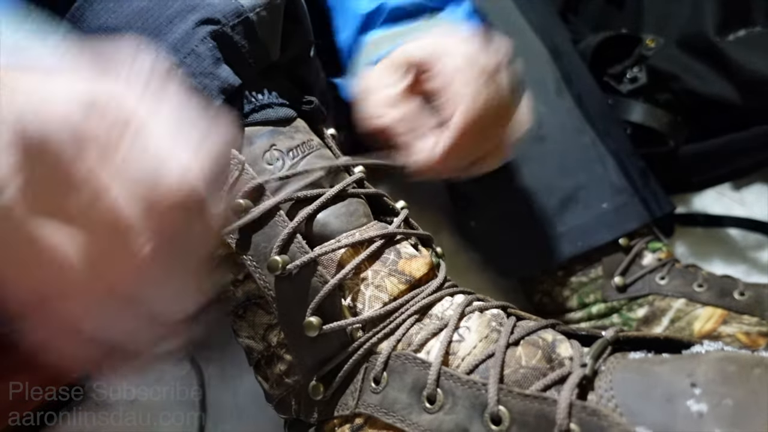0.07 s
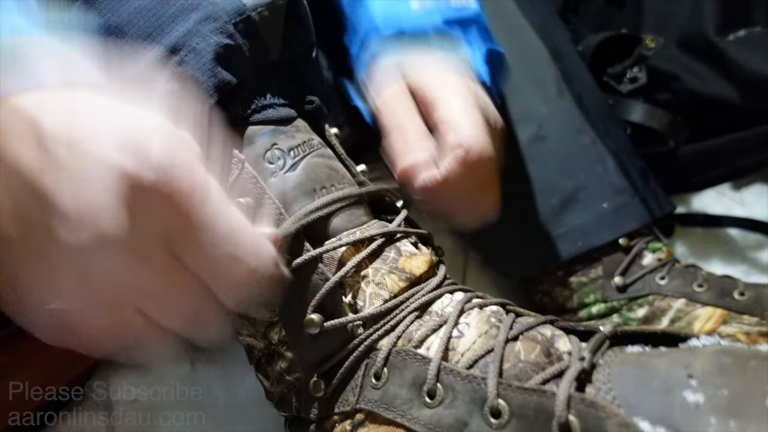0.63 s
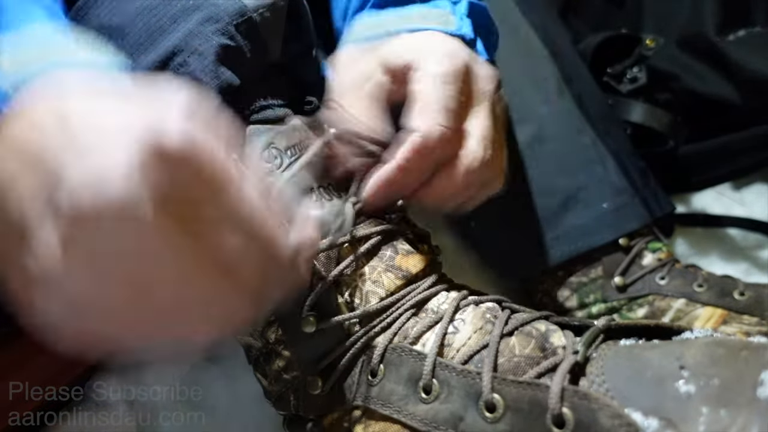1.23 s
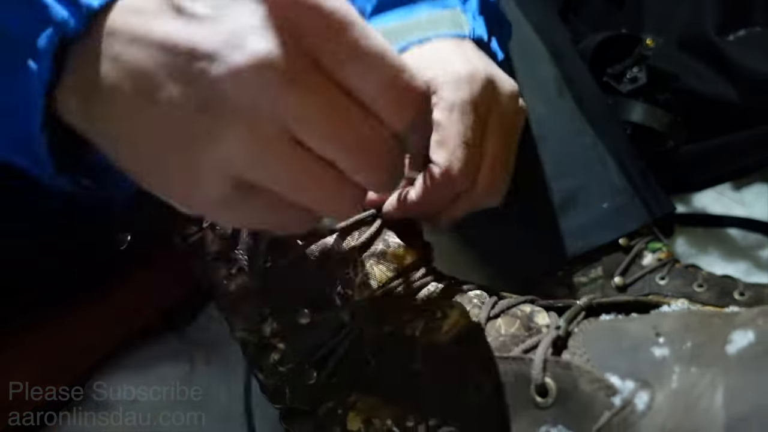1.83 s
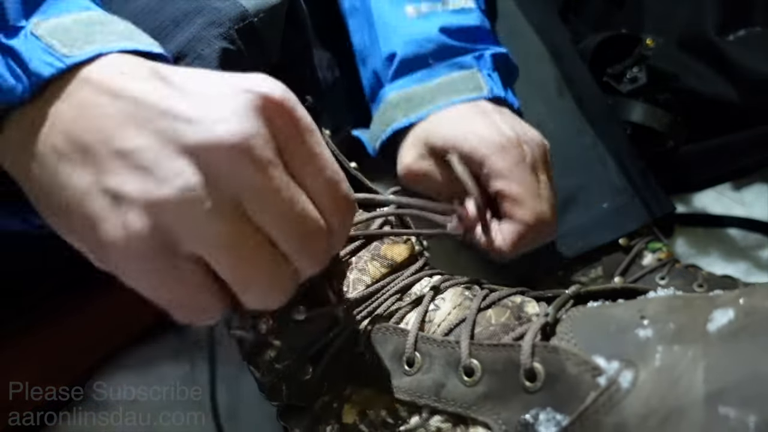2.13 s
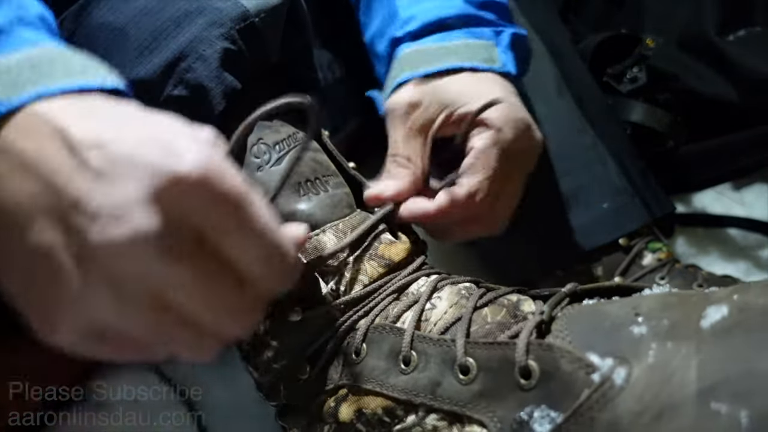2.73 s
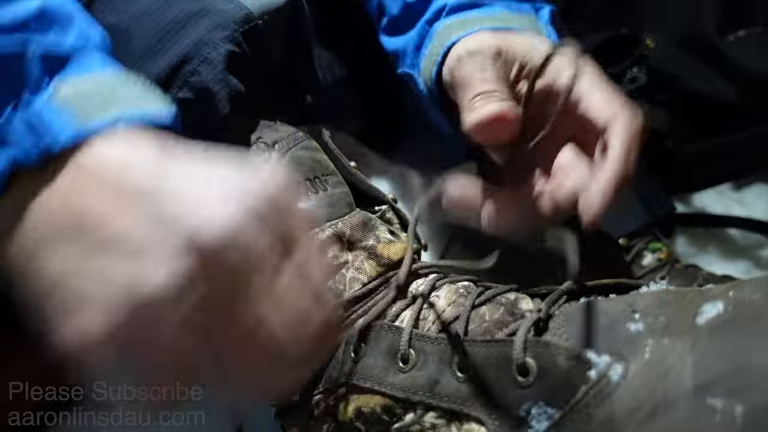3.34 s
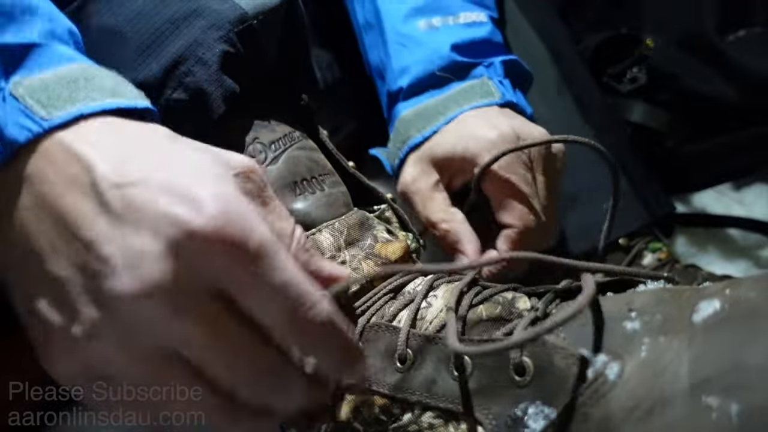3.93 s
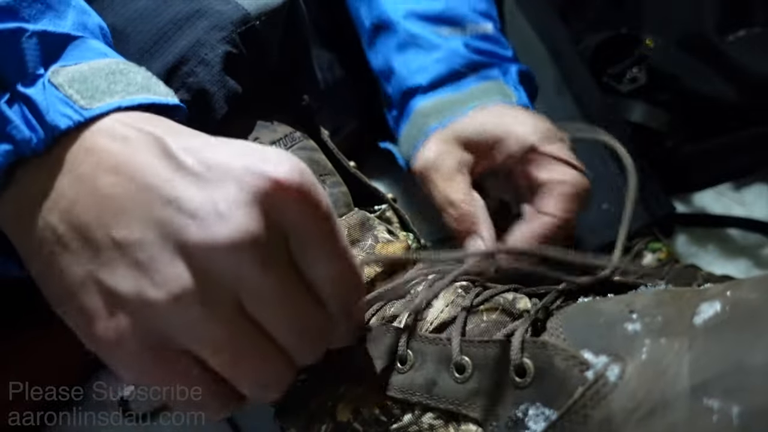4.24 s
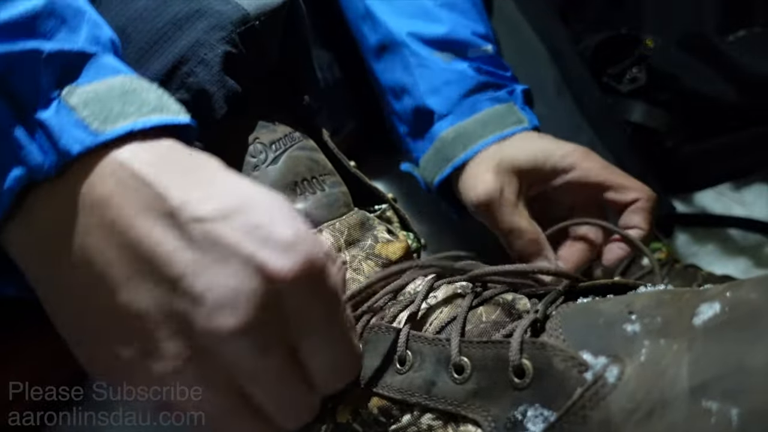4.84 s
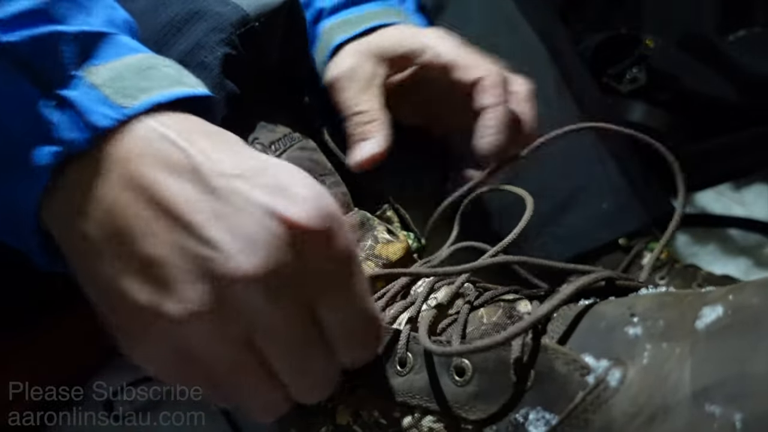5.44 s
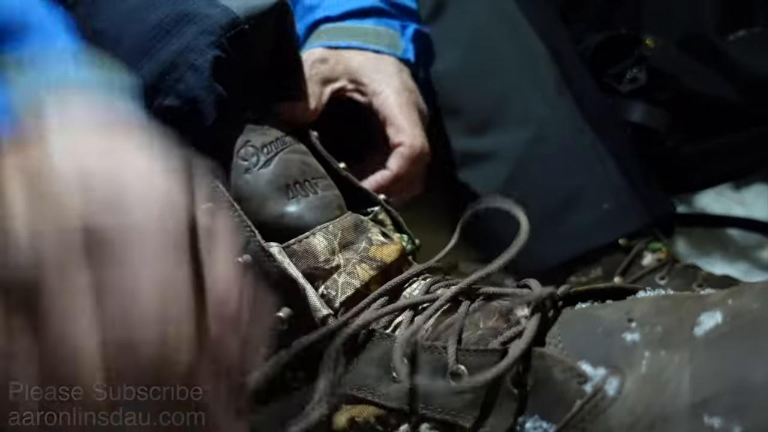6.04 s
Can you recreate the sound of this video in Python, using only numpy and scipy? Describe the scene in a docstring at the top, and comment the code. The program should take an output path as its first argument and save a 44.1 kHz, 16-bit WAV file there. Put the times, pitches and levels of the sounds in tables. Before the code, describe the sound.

Nylon sleeves swish softly as boot laces rasp through eyelets, with small hook clicks and dry taps on leather.

```python
"""Nylon sleeves swish with every arm stroke as two hands loosen a boot's laces inside a tent. The braided lace
rasps through the eyelets, clicks off the metal hooks and slaps the leather in short, dry knocks. Fingers rub,
and the padded boot gives in soft, low lumps. All the rubbing is fibre hiss plus tiny slips, swelling with the
speed of the hand. Everything is within arm's reach, over the faint hiss of a still night."""
import sys
import numpy as np
from scipy import signal
from scipy.fft import rfft, irfft, next_fast_len
from scipy.io import wavfile
from scipy.ndimage import uniform_filter1d, map_coordinates

SR = 44100
rng = np.random.default_rng(int(sys.argv[2]) if len(sys.argv) > 2 else 0)


def generate_wav(sig):
    """Save sig (samples, or channels by samples) to the path in sys.argv[1] as 16-bit PCM at SR."""
    pcm = np.round(np.clip(np.atleast_2d(sig).T, -1, 1) * 32767).astype(np.int16)
    wavfile.write(sys.argv[1], SR, pcm)


N = 268252

# Tone curves of sliding nylon, loose folds and taut cloth. Each row: frequency in Hz, gain in dB.
SWISH_EQ = [(500, -35.5), (1300, -8.5), (2100, -10), (3000, -7), (3550, -4), (3950, -4.5), (5200, -1.5),
            (6400, -3), (7400, -5), (8800, -9), (10300, -12.5), (12500, -14.5), (15800, -31)]
FOLDS_EQ = [(1500, -32), (2000, -5.5), (2400, -2), (2750, 1), (3300, -0.5), (3900, -9), (5000, -22.5)]
SHEEN_EQ = [(5000, -37), (7800, 0), (9000, 5), (10500, -0.5), (12500, 1), (14000, -4.5), (15800, -5.5)]
# Where the moving arm sits. Each row: time in seconds, left over right in dB.
ARM_PAN = [(0.0, 1), (0.07, 3), (0.25, 0), (4.18, 0), (4.42, -2.5), (4.84, 1.0), (5.27, -2), (5.32, -4),
           (6.08, 1)]


def sleeves():
    """Nylon slides on nylon; loose folds add a hollow note, taut cloth a fine sheen."""
    swish = friction(SWISH_EQ, slips_per_s=2500, spread_db=-1, grain_db=-4, patchy_db=1)
    swish *= amp(stroke_db("swish") + 1.41)
    folds = friction(FOLDS_EQ, slips_per_s=1500, spread_db=4.5, grain_db=-3.5, patchy_db=0.5)
    folds *= amp(stroke_db("folds") - 0.5)
    sheen = friction(SHEEN_EQ, slips_per_s=5600, spread_db=0.5, grain_db=-1, patchy_db=3.5)
    sheen *= amp(stroke_db("sheen"))
    flutter = amp(0.71 * wobble(60))
    pan_db = np.interp(np.arange(N) / SR, *np.transpose(ARM_PAN))
    return flutter * (swish + folds + sheen) * amp(np.array([pan_db, -pan_db]) / 2)


# A hand draws the lace. Each row: fastest moment, rise and fall in seconds, swish level in dB, then
# lace rasp, finger rub and loose folds in dB against that level. The layers add their own trims.
ARM_STROKES = [(.05, .08, 0.062, -47.5, -37, -10.5, -8), (.105, 0.039, 0.038, -53.5, -8.5, 3, 3),
               (0.214, 0.073, 0.087, -49, -13, -5, -2.5), (.4, 0.13, 0.17, -53, -14, -10, -3.5),
               (.575, .06, 0.091, -49, -16.5, -10, -3), (.67, .05, .05, -51.5, -11.5, -5.5, -2.5),
               (.83, 0.14, 0.065, -47.5, -10, -7.5, -1), (.965, 0.034, 0.072, -52.5, -13.5, -18, -0.5),
               (1.037, 0.044, 0.082, -50.5, -14.5, -5.5, -1.5), (1.23, 0.092, 0.047, -50.5, -17, -7.5, -4),
               (1.285, 0.053, 0.05, -51.5, -9.5, -3, 1.5), (1.41, 0.062, 0.07, -58, -9, -1, -5),
               (1.485, 0.063, 0.087, -56, -14, -5.5, -7), (1.63, 0.091, 0.078, -48, -14.5, -9, -3),
               (1.85, 0.11, 0.11, -47, -8, -4, -3), (2.055, 0.065, 0.054, -54, -9.5, -3, -2.5),
               (2.135, 0.072, 0.056, -53.5, -9.5, 1, -7), (2.345, 0.14, 0.15, -53.5, -15, -3, -1),
               (2.5, 0.093, 0.13, -55.5, -18, -8.5, 1.5), (2.61, 0.098, 0.11, -54.5, -14.5, -10, -2),
               (2.76, 0.045, 0.097, -55, -11.5, -4, -2), (2.9, 0.039, 0.084, -54, -16, -7.5, -4),
               (3.04, 0.077, 0.13, -54.5, -8.5, -3, -2.5), (3.23, 0.11, .1, -52.5, -7.5, -3, -1),
               (3.442, 0.092, 0.073, -49.5, -9.5, -6.5, -5), (3.675, 0.13, 0.08, -47, -8.5, -4.5, -2.5),
               (3.88, 0.083, 0.07, -52.5, -10.5, -5.5, -1), (3.945, 0.069, 0.095, -53, -15, -6.5, -4.5),
               (4.16, 0.098, 0.075, -54, -8.5, -5, -2.5), (4.3, 0.19, 0.32, -56, -7, -7.5, -4.5),
               (4.5, 0.026, 0.091, -61.5, -19, -33, -9), (4.73, 0.053, 0.099, -62, -14, -20, -5),
               (4.87, 0.094, 0.1, -64.5, -13, -21, -3), (5.01, 0.079, 0.14, -56, -8, -6, 1),
               (5.2, 0.075, 0.3, -52, -13.5, -4.5, -4), (5.41, 0.072, 0.11, -48, -20, -13.5, -19),
               (5.55, 0.14, 0.11, -46.5, -22, -5, -5), (5.76, 0.19, 0.29, -51.5, -15.5, -4.5, -3),
               (5.957, 0.075, 0.043, -45, -6, -1.5, -1), (6.08, 0.061, .05, -43, -13.5, -5, -3)]
USUAL_SWISH_DB, USUAL_RASP_DB = -52.5, -13  # an average stroke


def stroke_db(part):
    """Level ride in dB for one layer; all layers swell with the speed of the same hand."""
    times, rises, falls, swish, rasp, rub, folds = np.transpose(ARM_STROKES)
    # a hard pull stretches the cloth and adds sheen
    sheen = -5.5 + 0.35 * (rasp - USUAL_RASP_DB) - 0.1 * (swish - USUAL_SWISH_DB)
    share_db = {"swish": 0, "rasp": rasp, "rub": rub, "folds": folds, "sheen": sheen}[part]
    rest_db = -69 + np.mean(share_db)  # the sleeves never lie quite still
    return swells(times, rises, falls, swish + share_db, rest_db)


# Tone curves of the throaty braid and the papery finger rub. Each row: frequency in Hz, gain in dB.
RASP_EQ = [(100, -41), (250, -17.5), (380, -7.5), (500, -1.5), (620, 1.5), (800, -1.5), (1050, -7.5),
           (1800, -27), (4000, -44)]
RUB_EQ = [(400, -38), (750, -8), (1050, 0), (1550, 1), (1950, -2), (2500, -29.5), (5000, -27.5)]


def lace():
    """The braid catches strand by strand in the eyelets; finger rub sits a hair right."""
    rasp = amp(stroke_db("rasp") - 0.15 + 1.1 * wobble(40))
    rasp = rasp * friction(RASP_EQ, slips_per_s=350, spread_db=9.5, grain_db=-7.5, patchy_db=2.9)
    rub = amp(stroke_db("rub") + 1.06 * wobble(40))
    rub = rub * friction(RUB_EQ, slips_per_s=300, spread_db=4.5, grain_db=-4.5, patchy_db=0.5)
    return rasp + (rub + boot_resonance()) * amp([[-0.2], [0.2]])


# Boot resonances. Each row: time in seconds, length in seconds, resonance in Hz, level in dB. # Each swell is
# centred at the row's time on the window's own clock, which lies outside the window, # so these rows add next
# to nothing.
BOOT_RESONANCES = [(0.729, .007, 615, -48), (0.85, 0.1, 600, -58.5), (2.383, 0.053, 1410, -52.5),
                   (2.517, 0.12, 1950, -54), (3.385, 0.018, 434, -56), (3.447, .013, 490, -42),
                   (3.71, 0.17, 584, -63), (4.36, 0.078, 710, -62), (5.02, 0.04, 400, -68),
                   (5.166, 0.03, 360, -49.5), (5.535, 0.38, 1296, -54.5)]


def boot_resonance(q=3.1, size=32768):
    """Noise and slips ring through the boot's resonances, but each swell is centred at the row's time on the
    window's own clock, outside the window, so every row stays all but silent."""
    hz = np.fft.rfftfreq(size, 1 / SR)
    t = (np.arange(size) - size // 2) / SR
    drive = rng.standard_normal(N) + slips(per_s=560, spread_db=1.5)[0]
    drive = np.pad(drive, size, mode="wrap")
    out = np.zeros(N + 2 * size)
    for s, length, pitch_hz, db in BOOT_RESONANCES:
        resonance = 1 / (1 + 1j * q * (hz / pitch_hz - pitch_hz / (hz + 1)))
        start = round(s * SR) + size // 2
        body = unit(irfft(rfft(drive[start:start + size]) * resonance ** 2))
        swell = np.exp(-(2 * (t - s) / length) ** 2)
        out[start:start + size] += amp(db) * swell * body
    return out[size:size + N]


# Lace and fingers hit the leather. Each row: time in seconds, knock level in dB before the trim,
# knock pitch in Hz, thud and snap in dB against the knock, drag in seconds.
LEATHER_HITS = [(.075, -48, 1100, -14, 0, 0.0042), (.606, -45.5, 1495, -15, -2, 0.0048),
                (.638, -49, 1090, -11, -7, 0.0051), (.667, -48.5, 1350, -18, -13, 0.0013),
                (.73, -41.5, 1290, -19, -5, 0.00093), (1.117, -49.5, 1170, -16, -19, 0.0055),
                (1.224, -44, 1010, -15, -18, 0.0079), (1.25, -51, 1210, -7, -13, 0.011),
                (1.418, -50, 1310, -17, -12, 0.0016), (1.574, -50, 850, -8, 3, 0.0043),
                (1.628, -50, 910, -11.5, -4, 0.0034), (1.705, -48.5, 1200, -22, -15, 0.00075),
                (2.057, -54, 1140, -8, 5, 0.0026), (2.117, -50.5, 1270, -17, -15, 0.006),
                (2.177, -48, 1390, -28, -1.5, 0.0067), (2.182, -38, 1350, -20, -26, 0.0024),
                (2.281, -47, 1220, -25, -19, 0.0017), (2.342, -46.5, 1370, -13, -4, 0.00097),
                (2.724, -53, 1250, -8.5, -12, 0.005), (2.791, -53.5, 1370, -9, -8, .002),
                (2.845, -51.5, 1410, -9.5, -12, 0.0034), (3.075, -47.5, 1290, -22, -5, 0.0022),
                (3.214, -40.5, 1150, -22, -3.5, 0.0051), (3.39, -54, 1770, -17, 5, 0.018),
                (3.446, -38.5, 673, -33, -10, 0.0032), (3.72, -44.5, 1100, -37, -23, 0.0021),
                (3.745, -47, 840, -22, -15, .004), (3.764, -50.5, 840, -28, -17, 0.0014),
                (4.167, -43, 1040, -13, -22, 0.0068), (4.305, -48, 784, -39, -14, .0008),
                (4.495, -59, 1116, -30, -14, 0.00085), (4.71, -53.5, 1023, -9, -7, 0.0021),
                (4.926, -54.5, 910, -3.5, -5, 0.0019), (5.097, -56.5, 1270, -18, -4, 0.0014),
                (5.16, -53, 1420, -20, -11, .008), (5.169, -39, 763, -23, -0.5, 0.012),
                (5.243, -53, 1260, -11, 3, 0.0058), (5.943, -38, 850, -12, -21, 0.0052),
                (5.96, -43.5, 1074, -23, -1, 0.012)]


def leather_knocks(thud_hz=225, snap_hz=3100, soft_hz=1950, travel_s=0.00357, trim_db=-11.5, size=4096):
    """Each contact is a flick inside a short scuff; leather bends, so its low notes arrive last."""
    hz = np.fft.rfftfreq(size, 1 / SR) + 1
    middle = size // 2
    t = (np.arange(size) - middle) / SR
    band = lambda centre_hz, octaves: np.exp(-(np.log2(hz / centre_hz) / octaves / 2) ** 2)
    out = np.zeros((2, N + 2 * size))
    for s, db, knock_hz, thud_db, snap_db, drag_s in LEATHER_HITS:
        scuff = rng.standard_normal(size) * np.exp(-np.abs(t) / drag_s)
        rebound = round(rng.uniform(0.0016, 0.00181) * SR)  # the cord's bounce makes the knock hollow
        flick = signal.unit_impulse(size, middle) + 0.22 * signal.unit_impulse(size, middle + rebound)
        # the longer the lace drags, the more the scuff outweighs the flick
        push = flick + amp(-4) * drag_s / 0.00041 * scuff / np.linalg.norm(scuff)
        # bending waves take travel_s at 1 kHz, falling with the root of frequency; the knock is on time
        lag_cycles = travel_s * np.sqrt(1000) * (2 * np.sqrt(hz) - hz / np.sqrt(knock_hz))
        bent = rfft(push) * np.exp(-2j * np.pi * lag_cycles)
        knock = band(knock_hz, 0.61) / (1 + (hz / soft_hz) ** 10)  # a soft cord cannot drive the treble
        layers = [(0, knock), (thud_db, band(thud_hz, 0.58)), (snap_db, band(snap_hz, 0.58))]
        hit = sum(amp(level) * unit(irfft(bent * colour)) for level, colour in layers)
        pan_db = rng.normal(-0.6, 0.35)
        start = round(s * SR) + middle
        out[:, start:start + size] += amp(db + trim_db) * hit * amp([[pan_db], [-pan_db]])
    return out[:, size:size + N]


# Bright clicks off the hooks. Each row: start in seconds, peak level in dB, pitch in Hz.
HOOK_CLICKS = [(0.7284, -35, 2860), (2.058, -24, 4700), (2.3408, -31, 3350), (2.7227, -37, 6500),
               (3.0749, -26, 4500), (4.388, -43, 6200), (5.096, -45, 3500)]


def hook_clicks(t60=0.003):
    """The lace snaps over a metal hook; riveted into leather, the hook stops ringing almost at once."""
    t = np.arange(SR // 40) / SR
    out = np.zeros(N + len(t))
    for s, db, pitch_hz in HOOK_CLICKS:
        modes = [(pitch_hz, 0), (pitch_hz * 1.7, -6), (pitch_hz * 0.63, -3)]
        ring = sum(amp(mode_db + rng.normal(0, 3) - 60 * t / t60) * np.cos(2 * np.pi * hz * t)
                   for hz, mode_db in modes)
        out[round(s * SR):][:len(t)] += amp(db) * ring / np.abs(ring).max()
    return out[:N]


# Tone curve of the boot's dull low end. Each row: frequency in Hz, gain in dB.
LEATHER_EQ = [(20, -48), (45, -34), (70, -35), (105, -13), (170, -1.5), (280, 4), (450, -11), (1000, -21)]


def boot_give(press_s=0.022, settle_s=0.063):
    """The padded leather gives in soft, low lumps: under the pull of the lace and around each contact."""
    times, knock_db, _, thud_db, _, _ = np.transpose(LEATHER_HITS)
    pulled_db = -80 + 0.54 * (stroke_db("rasp") - USUAL_SWISH_DB - USUAL_RASP_DB)
    rises, falls = np.full(len(times), press_s), np.full(len(times), settle_s)
    pressed_db = swells(times, rises, falls, knock_db + thud_db - 10, rest_db=-89)
    give = np.hypot(amp(pulled_db), amp(pressed_db)) * amp(1.5 * wobble(28))
    return give * friction(LEATHER_EQ, slips_per_s=70, spread_db=5, grain_db=0.5, patchy_db=1)


def tent(x, t60=0.055, wet_db=-16):
    """Cloth walls and bedding give back only a faint, very short scatter."""
    t = np.arange(SR // 8) / SR
    tail = rng.standard_normal((2, len(t))) * amp(-60 * t / t60) * (t > .003)
    tail /= np.linalg.norm(tail[0])
    return x + amp(wet_db) * signal.fftconvolve(x, tail, axes=1)[:, :N]


# Tone curve of the background air. Each row: frequency in Hz, gain in dB.
AIR_EQ = [(20, -34), (60, -18), (200, 2.5), (1400, 8), (6000, 2.5), (16000, -7)]


def night_air(level_db=-69.5):
    """The faint, steady hiss of a still night."""
    air = rng.standard_normal(N) + 1.7 * rng.standard_normal((2, N))
    return amp(level_db) * unit(filtered(air, lambda hz: amp(along(AIR_EQ, hz))))


# Stereo image of all the rubbing. Each row: frequency in Hz, left-right likeness (1 is mono).
STEREO_LIKENESS = [(100, 1), (500, 0.95), (1000, 0.96), (1600, 0.98), (2800, 1), (3400, 0.99), (3900, 0.73),
                   (4600, 0.93), (5400, 1), (6300, 0.97), (7400, 0.76), (8800, 0.83), (11000, 0.54),
                   (14500, 1)]


def friction(eq, slips_per_s, spread_db, grain_db, patchy_db):
    """Stereo rubbing of rms 1: fibre hiss plus slips, with resonances that come and go as folds move."""
    source = rng.standard_normal((2, N)) + amp(grain_db) * slips(slips_per_s, spread_db)
    spectrogram = signal.stft(source, nperseg=1024)[2]
    patches = rng.standard_normal(spectrogram.shape[1:])
    for _ in range(2):  # smooth across frequency, then time
        patches = uniform_filter1d(uniform_filter1d(patches, size=5, axis=0), size=9, axis=1)
    rubbing = signal.istft(spectrogram * amp(patchy_db * unit(patches)), nperseg=1024)[1][:, :N]

    def mid_side_eq(hz):
        angle = np.arccos(np.clip(along(STEREO_LIKENESS, hz), -1, 1)) / 2
        return amp(along(eq, hz)) * np.array([np.cos(angle), np.sin(angle)])

    mid, side = filtered(rubbing, mid_side_eq)
    return unit(np.array([mid + side, mid - side]))


def slips(per_s, spread_db):
    """Two trains of tiny random slips of uneven size."""
    happens = rng.random((2, N)) < per_s / SR
    size = amp(spread_db * np.clip(rng.standard_normal((2, N)), -2, 2))
    return unit(happens * size * np.sign(rng.standard_normal((2, N))))


def swells(times, rises, falls, levels_db, rest_db, roundness=1.74):
    """Level in dB of overlapping moves that speed up and slow down; roundness 1 is peaked, 2 a bell."""
    t = np.arange(0, N + 64, 64) / SR
    power = amp(rest_db) ** 2
    for s, rise, fall, db in zip(times, rises, falls, levels_db):
        speed = np.exp(-np.abs((t - s) / np.where(t < s, rise, fall)) ** roundness)
        power = power + (amp(db) * speed) ** 2
    return np.interp(np.arange(N) / SR, t, 10 * np.log10(power))


def stroke_width(x):
    """Strong strokes pass close by and sound narrow; gentle ones open out wide."""
    side_db = 2.3 - 0.3 * (stroke_db("swish") - USUAL_SWISH_DB)
    mid = x.mean(axis=0)
    return mid + amp(side_db) * (x - mid)


def amp(db):
    """Decibels to gain."""
    return 10 ** (np.asarray(db) / 20)


def unit(x):
    """Scale to rms 1."""
    return x / np.sqrt(np.mean(x ** 2) + 1e-20)


def along(points, hz):
    """Read (Hz, value) points on a log axis."""
    point_hz, values = np.transpose(points)
    return np.interp(np.log(hz + 1), np.log(point_hz), values)


def wobble(rate):
    """A smooth random curve with rate knots a second."""
    knots = rng.standard_normal(int(N * rate / SR) + 4)
    return map_coordinates(knots, [np.arange(N) * rate / SR], mode="nearest")


def filtered(x, response):
    """Shape x with a gain given as a function of Hz."""
    size = next_fast_len(N + SR // 2)
    return irfft(rfft(x, size) * response(np.fft.rfftfreq(size, 1 / SR)), size)[..., :N]


def scene():
    """Sleeves and lace up front, the boot's low end beneath, knocks and clicks in the tent, then air."""
    return stroke_width(sleeves() + lace()) + boot_give() + tent(leather_knocks() + hook_clicks()) + night_air()


def record(dry, low_cut_hz=68, top_hz=15780):
    """Thin the deep bass and cut off the very top."""
    return filtered(dry, lambda hz: (hz < top_hz) / np.sqrt(1 + (low_cut_hz / (hz + 1)) ** 6))


dry = scene()
out = record(dry)
generate_wav(out)
```